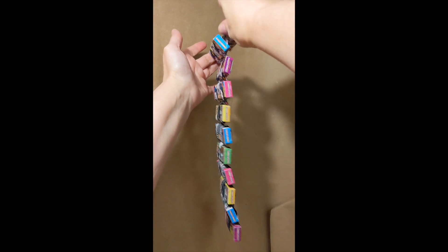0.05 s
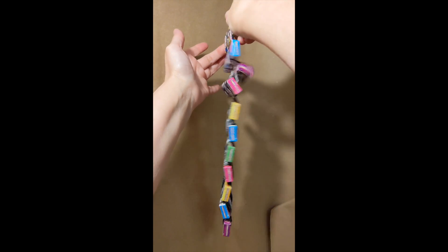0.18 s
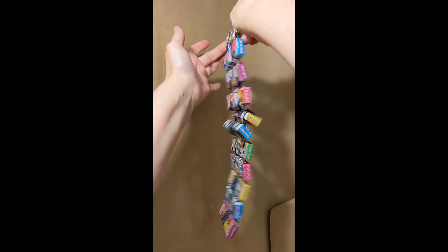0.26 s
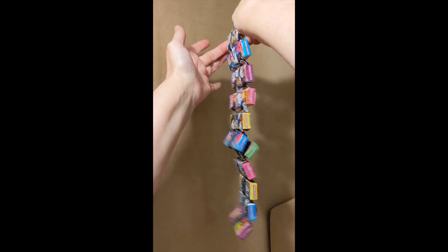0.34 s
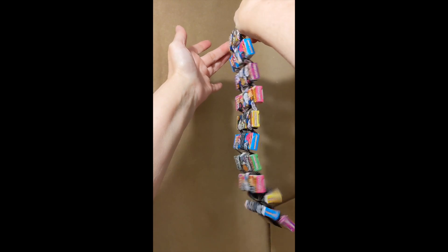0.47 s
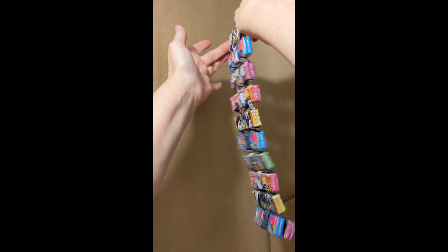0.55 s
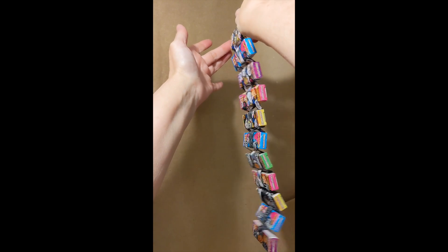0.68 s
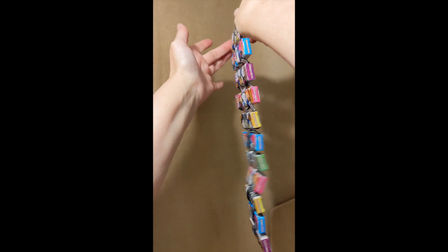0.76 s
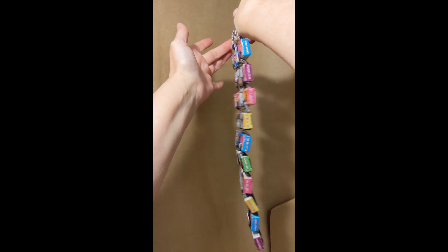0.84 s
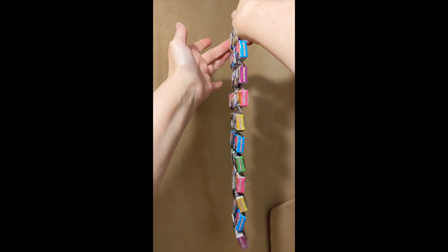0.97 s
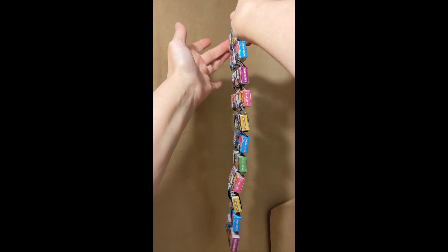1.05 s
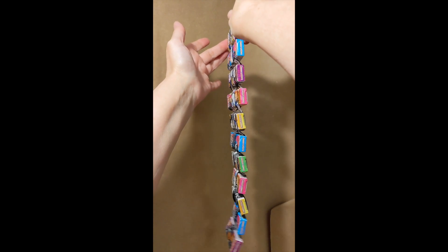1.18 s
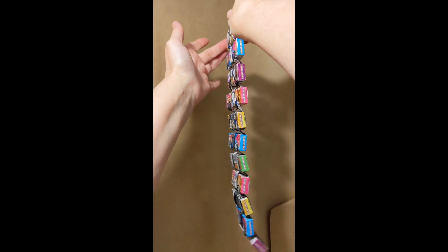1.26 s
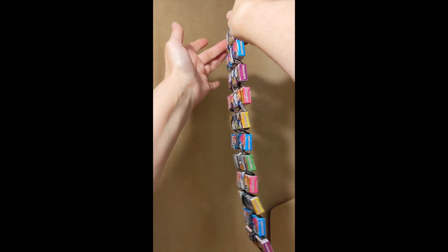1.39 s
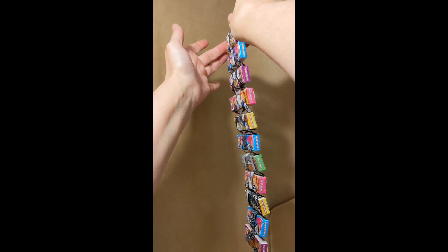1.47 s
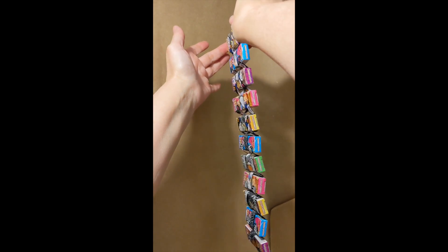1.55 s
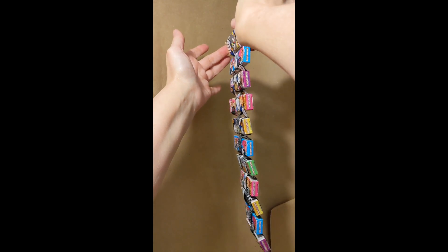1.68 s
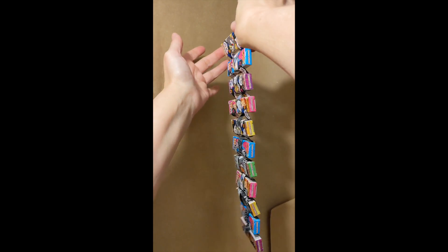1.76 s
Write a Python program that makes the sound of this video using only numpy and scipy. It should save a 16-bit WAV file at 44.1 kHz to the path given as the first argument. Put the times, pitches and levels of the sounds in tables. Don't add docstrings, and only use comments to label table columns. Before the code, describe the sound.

A ribbon-linked chain of little card boxes flips over, rapidly slapping and rustling, then rattles quietly still

```python
import sys
import numpy as np
from scipy import signal
from scipy.io import wavfile

SR = 44100
rng = np.random.default_rng(int(sys.argv[2]) if len(sys.argv) > 2 else 0)


def waveform_to_disk(signal):
    frames = np.transpose(np.atleast_2d(signal))
    scaled = np.clip(frames, -1, 1) * 32767
    samples = np.round(scaled).astype(np.int16)
    wavfile.write(sys.argv[1], SR, samples)


def convert_level_to_amplitude(level_db):
    exponent = np.asarray(level_db, float) / 20
    return 10 ** exponent


N = 79380


def rms_one(x):
    return x / np.sqrt(np.mean(x ** 2) + 1e-20)


def at_hz(points, hz):
    table_hz, value = np.transpose(points)
    return np.interp(np.log(hz), np.log(table_hz), value)


def drift(rate_hz):
    r = np.exp(-2 * np.pi * rate_hz / SR)
    wander = signal.lfilter([1], [1, -2 * r, r * r], rng.standard_normal(N + SR))
    return rms_one(wander[SR:])


def butter_sos(order, hz, kind, x):
    return signal.sosfilt(signal.butter(order, hz, kind, fs=SR, output="sos"), x)


HUM_HZ, HUM_WIDTH_HZ, HUM_DB, HUM_STEADY_DB = 59.5, 7.9, -63.5, -60


def hum():
    phase = 2 * np.pi * HUM_HZ * np.arange(N) / SR
    waver = drift(HUM_WIDTH_HZ) * np.sin(phase) + drift(HUM_WIDTH_HZ) * np.cos(phase)
    return convert_level_to_amplitude(HUM_STEADY_DB) * np.sqrt(2) * np.sin(phase) + convert_level_to_amplitude(HUM_DB) * waver


AIR_DB, AIR_PATCHY_DB = -59.5, 0.5
# f/Hz, level/dB per Hz
AIR_SPECTRUM = [(41, -30), (70, 2), (272, -10), (1030, -19), (1850, -17.5), (3650, -28.5), (8810, -29.5),
                (13800, -40), (15500, -50)]
# f/Hz, likeness/0-1
AIR_LIKENESS = [(60, 0.83), (240, 0.89), (950, 0.23), (3770, -0.1), (15000, -0.0)]


def air():
    edges = 92 * 2 ** np.arange(0, 7.6, .5)
    together = drift(6.1)
    white = rng.standard_normal((2, 2, N))
    out = 0
    for k, (low, high) in enumerate(zip(edges, edges[1:])):
        mid, side = butter_sos(2, [low, high], "band", white[k % 2])
        hz = np.sqrt(low * high)
        alike = np.clip(at_hz(AIR_LIKENESS, hz), -1, 1)
        level_db = at_hz(AIR_SPECTRUM, hz) + AIR_PATCHY_DB * (0.26 * together + drift(5.0))
        stereo = np.sqrt(1 + alike) * mid + np.sqrt(1 - alike) * side * [[1], [-1]]
        out = out + convert_level_to_amplitude(level_db) * stereo
    return convert_level_to_amplitude(AIR_DB) * rms_one(out)


ROOM_DB, ROOM_T60_S, WALL_CUT_HZ, FIRST_ECHO_S = -8.5, .07, 14000, .001


def room(x):
    t = np.arange(SR // 4) / SR
    echoes = rng.standard_normal((2, len(t))) * convert_level_to_amplitude(-60 * t / ROOM_T60_S) * (t > FIRST_ECHO_S)
    echoes = signal.lfilter(*signal.butter(1, WALL_CUT_HZ, fs=SR), echoes)
    echoes = echoes / np.sqrt(np.sum(echoes ** 2) / 2)
    return convert_level_to_amplitude(ROOM_DB) * signal.fftconvolve(x, echoes, axes=1)[:, :N]


# t/s, level/dB
MOTION = [(0, -62.5), (.06, -55), (.185, -66.5), (.21, -42.5), (.30, -40), (.355, -46.5), (.44, -38),
          (.52, -40), (.63, -34.5), (.70, -49), (.73, -54.5), (.79, -44), (.9, -54.5), (1.0, -57),
          (1.13, -85), (1.5, -68.5), (1.59, -79.5), (1.8, -64.5)]
PUFF_DB, PUFF_LOW_HZ, PUFF_HIGH_HZ = -20, 106, 253


def puff():
    flutter = butter_sos(2, [PUFF_LOW_HZ, PUFF_HIGH_HZ], "band", rng.standard_normal(N))
    motion_db = np.interp(np.arange(N) / SR, *np.transpose(MOTION))
    return convert_level_to_amplitude(PUFF_DB + motion_db) * rms_one(flutter)


BRIGHT_FROM_HZ, HOLLOW_UNDER_HZ, DEEP_UNDER_HZ, BOX_LOW_HZ = 3900, 900, 550, 340
PORT_LAG_S, LAG_SCATTER_S = .00016, .000085
FAVOUR_OCTAVES, MODE_SCATTER_DB = .2, 2.5
# f/Hz, level/dB, t60/s, left over right level/dB
BOX_MODES = [(460, -11, 0.035, 3), (655, -10, 0.026, 2.5), (860, -14, 0.012, 1.5), (1250, -9, 0.012, 2.5),
             (1870, -1.5, 0.013, -4.5), (2208, -1.5, 0.01, -4), (2500, 1.5, 0.007, -3),
             (3200, 2.5, 0.0092, -1), (4780, -2.5, 0.0055, -1.5), (5800, -1.5, 0.004, -1.5),
             (6830, -1.5, 0.003, 0.6), (8920, -7, 0.0035, -1.5), (11150, -9, 0.002, 1.5),
             (13100, -8, 0.002, 1.5)]
BOX_TUNINGS = [.95, .985, 1.015, 1.05]
# t/s, deep over shallow level/dB
DEPTH = [
    (0.15, -7),
    (.33, -7),
    (.37, 3),
    (.45, -3),
    (.58, -1.5),
    (.63, 8),
    (.72, -3),
    (1.8, 1.5),
]


def clicks_at(samples, size):
    i = samples.astype(int)
    late = samples - i
    return np.bincount(i, size * (1 - late), N) + np.bincount(i + 1, size * late, N)


def strike(s, db, bright_db, hollow_db, favoured_hz, favour_db, box):
    out, n = np.zeros((2, N)), len(s)
    depth_db = np.interp(s, *np.transpose(DEPTH))
    for hz, level_db, t60, pan_db in BOX_MODES:
        tint_db = bright_db * (hz > BRIGHT_FROM_HZ) + hollow_db * (hz < HOLLOW_UNDER_HZ)
        tint_db = tint_db + depth_db * ((hz < DEEP_UNDER_HZ) - (hz < HOLLOW_UNDER_HZ) / 2)
        nearness = np.exp(-(np.log2(hz / favoured_hz) / FAVOUR_OCTAVES) ** 2)
        tint_db = tint_db + (favour_db - level_db) * nearness
        scatter_db = MODE_SCATTER_DB * rng.standard_normal(n)
        size = convert_level_to_amplitude(db + level_db + tint_db + scatter_db) * rng.choice([-1, 1], n)
        lag_s = PORT_LAG_S + LAG_SCATTER_S * rng.standard_normal(n)
        at = np.clip(np.array([s + lag_s, s]) * SR, 0, N - 2)
        soft = signal.butter(2, min(2 * hz, 20000), fs=SR)
        r = convert_level_to_amplitude(-60 / (t60 * SR))
        pan = convert_level_to_amplitude(np.array([[pan_db], [-pan_db]]) / 2)
        for k, tuning in enumerate(BOX_TUNINGS):
            w = 2 * np.pi * hz * tuning / SR
            own = size * (box == k)
            blows = signal.lfilter(*soft, [clicks_at(port, own) for port in at])
            out += pan * signal.lfilter([0, np.sin(w)], [1, -2 * r * np.cos(w), r * r], blows)
    return butter_sos(4, BOX_LOW_HZ, "high", out)


GRAIN_SPREAD, BRIGHT_PER_DB, RUSTLE_BRIGHT_DB, RUSTLE_HOLLOW_DB = 2.04, -0.1, 2.5, 1.5
RUSTLE_FAVOUR_DB = 5


def rustle():
    s = np.sort(rng.uniform(0, N / SR, 6000))
    i = (s * SR).astype(int)
    clump_db = 3.3 * drift(160)[i]
    db = GRAIN_SPREAD * np.minimum(rng.exponential(1, len(s)), 5) + clump_db
    motion_s, motion_db = np.transpose(MOTION)
    below_peak_db = np.interp(s, motion_s, motion_db) - np.max(motion_db)
    bright_db = RUSTLE_BRIGHT_DB + BRIGHT_PER_DB * below_peak_db
    favoured_hz = 2000 * 2 ** (drift(8.6)[i] / 2)
    box = rng.integers(0, len(BOX_TUNINGS), len(s))
    grains = strike(s, db, bright_db, RUSTLE_HOLLOW_DB, favoured_hz, RUSTLE_FAVOUR_DB, box)
    return convert_level_to_amplitude(np.interp(np.arange(N) / SR, motion_s, motion_db)) * rms_one(grains)


def flat(*touches):
    return [a.ravel() for a in np.broadcast_arrays(*touches)]


TAP_DB, TAP_GAP_MS, TAP_LOSS_DB = -17, .8, 2.5
TAP_FAVOUR_DB, TAP_BRIGHT_DB, TAP_HOLLOW_DB = 10, -5, -4
# t/s, level/dB, ring f/Hz
TAPS = [(0.0034, -40, 1790), (0.0501, -34, 2260), (0.0652, -49, 2300), (0.074, -42, 2260),
        (0.1157, -56, 2760), (0.1264, -57, 1980), (0.2516, -32.9, 1710), (0.3283, -32, 1900),
        (0.3347, -33.8, 2050), (0.3597, -29, 1740), (0.495, -36, 1820), (0.5233, -31, 1760),
        (0.552, -31, 1920), (0.6887, -31, 1700), (0.6971, -22.5, 1990), (0.723, -47, 2300),
        (0.8134, -35, 1960), (0.857, -32, 2340), (0.8989, -55, 2060), (0.9498, -45, 1950),
        (0.9694, -46, 2340), (0.993, -46, 1990), (1.001, -41, 2370), (1.0122, -53, 1950),
        (1.0305, -38.5, 1730), (1.0601, -33, 1830), (1.0842, -34, 1950), (1.094, -40, 3010),
        (1.1003, -39, 1940), (1.1135, -51, 1950), (1.1555, -38, 2030), (1.1846, -64, 2240),
        (1.1928, -41, 1910), (1.2026, -49, 1920), (1.2378, -40, 1880), (1.255, -48, 1800),
        (1.276, -56, 1700), (1.307, -58, 1700), (1.3486, -48, 1880), (1.3665, -51.8, 1830),
        (1.3744, -57.0, 900), (1.3877, -62, 1890), (1.414, -57, 3090), (1.4427, -51, 1750),
        (1.4502, -47, 1780), (1.457, -57.4, 2220), (1.479, -46.5, 1820), (1.521, -41.5, 2600),
        (1.556, -46, 2170), (1.568, -58.8, 2230), (1.5814, -68, 2120), (1.628, -48, 2400),
        (1.664, -42, 1810), (1.6919, -42, 1850), (1.7063, -47, 1910), (1.7426, -36.5, 1820),
        (1.761, -57.2, 1970), (1.7772, -64, 1070)]


def taps():
    s, db, hz = np.transpose(TAPS)[:, :, None]
    k = np.arange(3)
    uneven = rng.uniform(.6, 1.4, (len(TAPS), 3))
    box = rng.integers(0, len(BOX_TUNINGS), (len(TAPS), 1))
    touch_s = s + k * uneven * TAP_GAP_MS / 1000
    touch_db = db + TAP_DB - TAP_LOSS_DB * k
    return flat(touch_s, touch_db, TAP_BRIGHT_DB, TAP_HOLLOW_DB, hz, TAP_FAVOUR_DB, box)


KNOCK_DB, FAVOUR_DB, TOUCHES = -15.5, 9, 14
CHATTER_MS, CHATTER_MS_PER_DB, USUAL_DB = 6.0, 0.29, -30
FULL_CONTACT = .33
TOUCH_SCATTER_DB, SWELL_DB, FADE_DB = 2, 12, 11
# t/s, peak level/dB, brightness/dB, hollow thump/dB, favoured ring f/Hz
FLIPS = [(0.1989, -28, 5.5, 4, 1970), (0.2068, -33, 9, 10.5, 2460), (0.22, -39, 12.5, 0, 660),
         (0.2397, -25, 9.5, 2.5, 1165), (0.2677, -24, 7, 9, 1960), (0.3021, -24, 9, -14, 1840),
         (0.3055, -22, 6, -2.5, 1840), (0.37, -21, 5.5, 4.5, 1800), (0.3914, -31, -5, -12, 3100),
         (0.4076, -37.5, -18, -22, 1870), (0.4218, -31, 12.5, -8, 3200), (0.4416, -28, 0, -13, 1750),
         (0.4464, -24.5, 7, -3, 1920), (0.4745, -25.5, 10.5, 8.5, 2180), (0.5103, -28, -11, -2, 1960),
         (0.547, -22.5, 5.5, -4, 1730), (0.5747, -23.5, 8.5, 2.5, 1730), (0.606, -26.5, -5, 1, 2200),
         (0.6196, -19.5, 11, -13, 2550), (0.6236, -19.5, 6, -0.5, 2060), (0.631, -25, 10.5, -1.5, 1880),
         (0.645, -30, -11, 12, 1920), (0.6824, -25.5, -2, -1, 1790), (0.7079, -40, 14, 6, 2000)]
SWINGS = [(0.0601, -41, 9.5, -14, 2150), (0.0877, -38.5, 3, 3, 2000), (0.1206, -45.5, 13, 3, 2800),
          (0.157, -44.5, 9, -15, 2380), (0.7506, -33, -0.5, 2.5, 1968), (0.7645, -32.5, -2, 8, 1880),
          (0.7727, -30, 2.5, 2.5, 1900), (0.785, -26.5, -4, 2.5, 3160), (0.801, -29.5, -5, 1.5, 3160),
          (0.8488, -34, -12, 0, 1970), (0.861, -24.5, -0.5, -13, 1790), (0.9258, -40, -13, 3.5, 1970),
          (0.942, -35.5, 3.5, 4.5, 2150), (0.9551, -32.5, -6, -1, 3270), (0.9813, -39.5, -30, 6.5, 1970),
          (1.04, -40.5, 0.5, 3.5, 3200), (1.052, -37.5, -2.5, 9, 2940), (1.0745, -37.5, -1, 4, 3150)]
TICKS = [(1.147, -54, 10, -20, 1930), (1.174, -46, 5, 7, 3140), (1.2306, -39, -4.5, 3.5, 2520),
         (1.2513, -43, -6, 5.5, 2100), (1.2844, -43, -9, -5, 1560), (1.325, -38, -5, -14, 1320),
         (1.3614, -42.5, -6, -3, 1870), (1.3937, -49, -20, -20, 2170), (1.4083, -47.5, -19, 5, 1850),
         (1.422, -44.5, 6.5, -3, 1870), (1.4886, -41.5, -0.5, 9.5, 1930), (1.509, -43.5, -9, -4, 2330),
         (1.5303, -45.5, -8, 6, 2540), (1.6141, -50, 8, 13, 1760), (1.6419, -46.5, 5, 10, 2040),
         (1.672, -46, 1, -3, 2460), (1.729, -44.5, -15, 2, 2460)]
MORE_FLIPS = [
    (0.233, -34.5, 8, -3, 2180),
    (0.2818, -34.5, 10, -5, 1850),
    (0.316, -32, -10, 9, 1190),
    (0.3988, -33.5, -21, -14, 1830),
    (0.4253, -25.5, -13, -19, 2220),
    (0.4676, -28.5, 0, -15, 2200),
    (0.5652, -29.5, -10, -11, 1780),
    (0.667, -42, -4, 18, 2020),
    (0.6924, -33, -3, 2.5, 1900),
    (0.74, -41.5, -15, -7, 1860),
]


def knocks():
    rows = list(FLIPS) + list(SWINGS) + list(TICKS) + list(MORE_FLIPS)
    s, db, bright_db, hollow_db, hz = np.transpose(rows)[:, :, None]
    k = np.arange(TOUCHES)
    time_chance, level_chance = rng.uniform(-1.183, 1, (2, len(rows), TOUCHES))
    place = (k + (k > 0) * time_chance / 2) / TOUCHES
    shape_db = np.interp(place, [0, FULL_CONTACT, 1], [-SWELL_DB, 0, -FADE_DB])
    length_s = np.maximum(CHATTER_MS + CHATTER_MS_PER_DB * (db - USUAL_DB), 1) / 1000
    first_box = rng.integers(0, len(BOX_TUNINGS), (len(rows), 1))
    box = (first_box + k % 2) % len(BOX_TUNINGS)
    touch_db = db + KNOCK_DB + shape_db + TOUCH_SCATTER_DB * level_chance
    return flat(s + place * length_s - .0005, touch_db, bright_db, hollow_db, hz, FAVOUR_DB, box)


def scene():
    touches = [np.concatenate(pair) for pair in zip(knocks(), taps())]
    ladder = strike(*touches) + rustle()
    return hum() + air() + room(ladder) + puff() + ladder


def top_cut(x):
    return signal.sosfilt(signal.butter(12, 16330, fs=SR, output="sos"), x)


LOW_CUT_HZ, CUTOFF_HZ = 59, 15700


def record(dry):
    x = butter_sos(2, LOW_CUT_HZ, "high", dry)
    x = signal.sosfilt(signal.ellip(8, .5, 60, CUTOFF_HZ, fs=SR, output="sos"), x)
    return top_cut(x)


dry = scene()
out = record(dry)
waveform_to_disk(out)
```